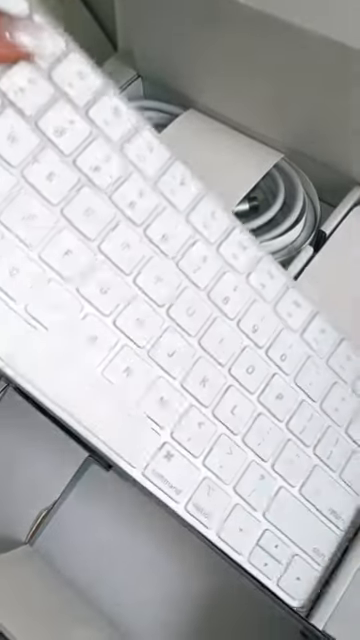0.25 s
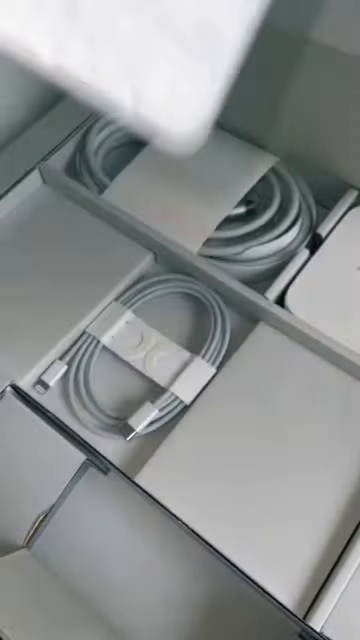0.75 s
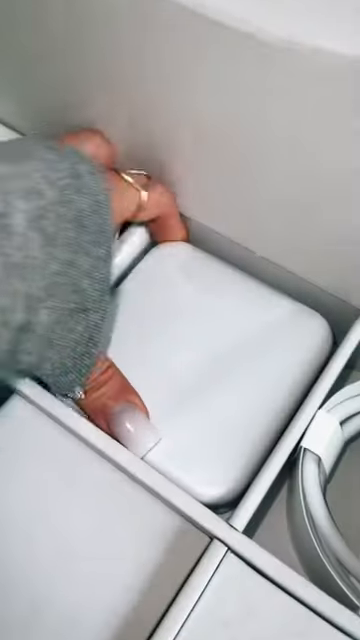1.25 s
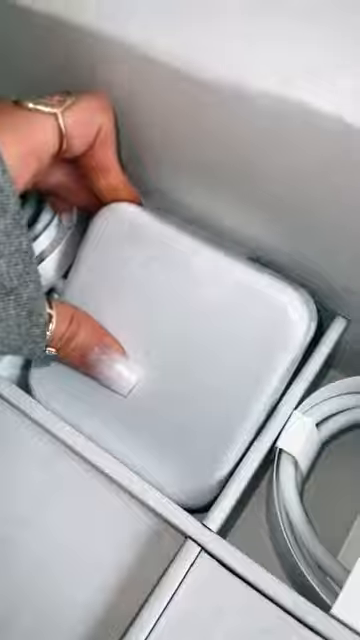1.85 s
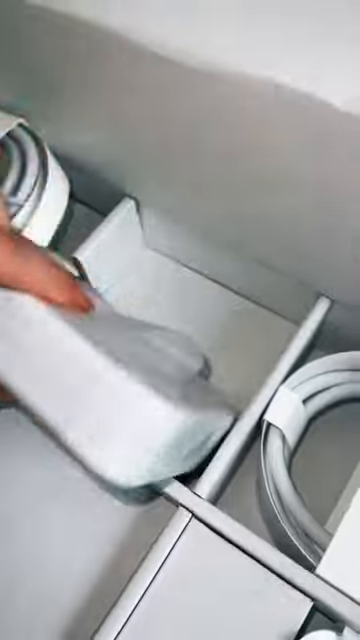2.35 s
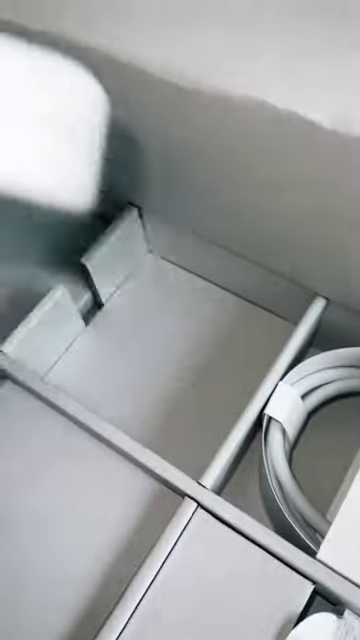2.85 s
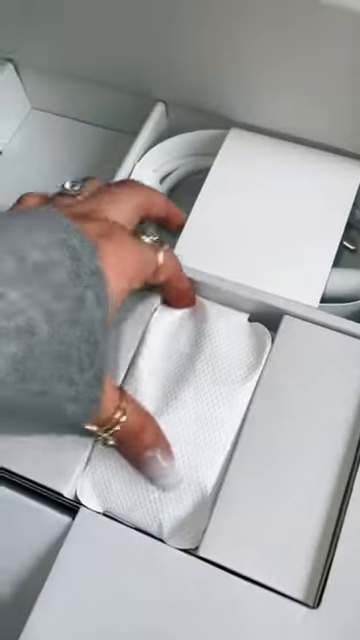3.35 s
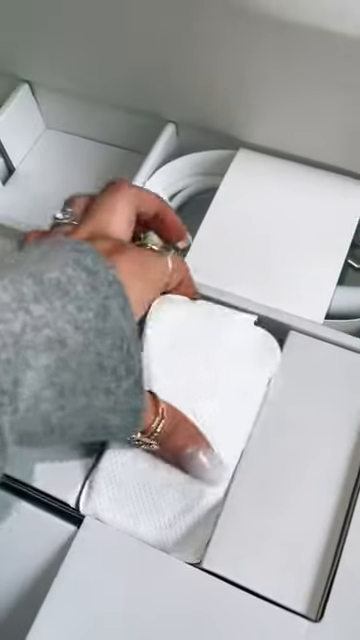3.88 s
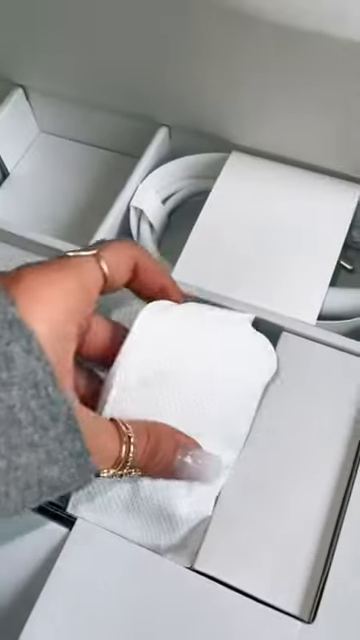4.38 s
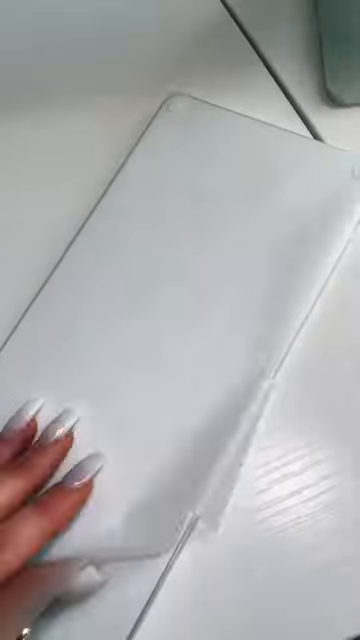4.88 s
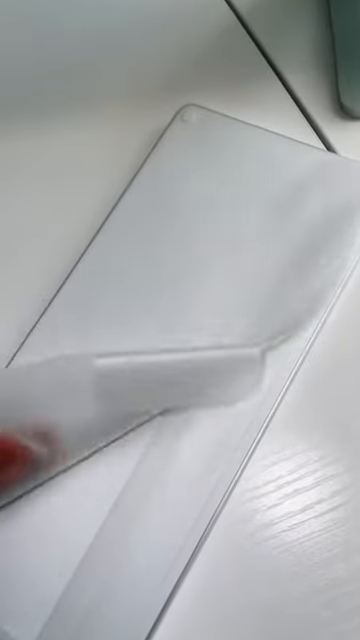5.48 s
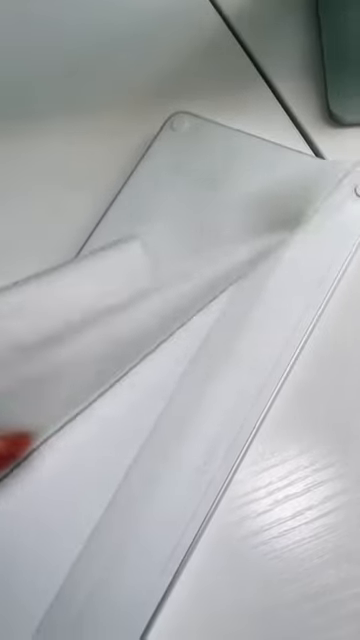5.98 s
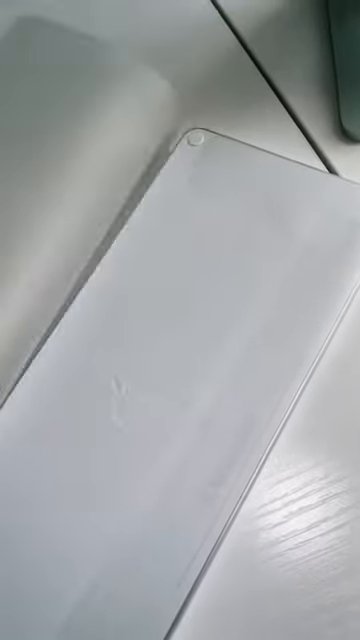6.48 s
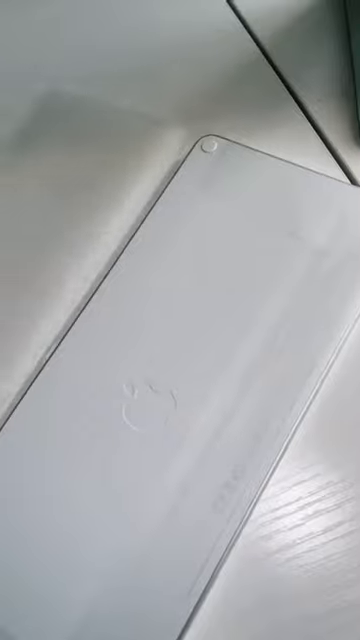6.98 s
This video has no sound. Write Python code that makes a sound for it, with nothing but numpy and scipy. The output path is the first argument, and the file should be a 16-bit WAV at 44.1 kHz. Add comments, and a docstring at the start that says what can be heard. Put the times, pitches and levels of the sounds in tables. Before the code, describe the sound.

Four close passages of unpacking, parted by brief silences: a light slide with thin hiss; scraping, fingernail taps, squeaky catches and soft thuds on a card box; faint papery creasing with a few ticks and one sharp knock; then a stiff wrapping sheet buckling in dense, loud snaps. Low rumble and soft hush lie beneath, with a small room's echo.

```python
"""A keyboard slides off its tray in a bare room, the first of four close-up passages of unpacking a box.
Then fingernails pry a wrapped power adapter and a paper-wrapped mouse out of card compartments, and a stiff
wrapping sheet is peeled back, snapping as it buckles. Rubbing is filtered stick-slip noise; taps, catches,
snaps and knocks are damped modes falling in pitch; the room adds decaying scatter, a low rumble and a hush."""
import sys
import numpy as np
from scipy import signal
from scipy.fft import rfft, irfft, next_fast_len
from scipy.io import wavfile
from scipy.ndimage import uniform_filter1d

SR = 44100
rng = np.random.default_rng(int(sys.argv[2]) if len(sys.argv) > 2 else 0)


def master(y):
    """Save y as 16-bit WAV."""
    cut = np.clip(np.atleast_2d(y).T, -1, 1)
    pcm = np.round(cut * 32767)  # scale
    wavfile.write(sys.argv[1], SR, pcm.astype(np.int16))


N = 318843
TIME = np.arange(N) / SR  # s
FREQS = np.maximum(np.fft.rfftfreq(N, 1 / SR), 1)  # Hz
# the four passages, with silence between them: start t/s, end t/s
PASSAGES = [(-.02, .7), (.893, 2.935), (3.125, 4.768), (4.935, 7.068)]


def keyboard_rubbing():
    """Sliding friction: slips on the tray excite the keyboard's modes."""
    # strokes of the hand: start t/s, length t/s, scraping level/dB, hiss over scraping level/dB
    strokes = [(0, 0.039, -45.5, -3.5), (.152, 0.02, -52.5, 5.5), (.185, 0.039, -38, -1),
               (.236, 0.021, -34, -1), (.285, 0.11, -52.5, -11)]
    # spectrum of the rubbing: f/Hz, relative density level/dB per Hz
    colour = [(130, 9), (215, 12), (430, 1.5), (560, -13.5), (1500, -12.5), (2050, -13.5), (3600, -9),
              (6000, -13), (8500, -13), (10000, -21)]
    # resonances: f/Hz, width f/Hz, level over the plain rubbing/dB
    modes = [(1730, 140, 9.5), (2410, 82, -1), (3620, 200, 4), (4400, 170, 2.5), (6440, 70, 4.5)]
    slips = friction(per_s=1600, spread_db=1, clump_db=2, smooth=0.3)
    return rubbing(strokes, colour, modes, slips,
                   attack_s=0.073, release_s=0.04, flex_db=-2, wander_db=1.5)


def adapter_rubbing():
    """Stick-slip on card, with creases that yield and ring in the wrapping."""
    # strokes of the hand: start t/s, length t/s, scraping level/dB, hiss over scraping level/dB
    strokes = [(1.085, 0.099, -56, -9), (1.34, 0.074, -50, -15.5), (1.44, 0.096, -46, -10),
               (1.592, 0.027, -39, -17.5), (1.66, 0.035, -54, -0.5), (1.735, 0.046, -50, -7),
               (1.872, 0.035, -38, -12.5), (1.935, 0.048, -35, -1.5), (2.04, 0.097, -46.5, -2.5),
               (2.15, 0.066, -46, -4), (2.298, 0.085, -36, -7.5), (2.39, 0.062, -32, -11),
               (2.465, 0.014, -33, -2.5), (2.535, 0.07, -55, 10.5), (2.69, 0.073, -44, -9),
               (2.8, 0.06, -44, -5.5), (2.88, 0.077, -52, -5.5)]
    # spectrum of the rubbing: f/Hz, relative density level/dB per Hz
    colour = [(120, -3), (170, 3), (300, -5), (500, -10.5), (690, -4), (1150, -7.5), (2100, -7.5),
              (2900, -16), (6000, -19.5), (9000, -21), (10000, -32)]
    slips = friction(per_s=1800, spread_db=2, clump_db=4, smooth=0.55)
    slips += crinkles(per_s=110, level_db=0, spread_db=2.5, centre_hz=2800, spread_octaves=0.7, cycles=7)
    return rubbing(strokes, colour, [], slips,
                   attack_s=0.069, release_s=0.084, flex_db=1.0, wander_db=1.0)


def mouse_rubbing():
    """Stick-slip on card and lower-pitched paper creases excite the wrapped mouse's modes."""
    # strokes of the hand: start t/s, length t/s, scraping level/dB, hiss over scraping level/dB
    strokes = [(3.125, 0.011, -52.5, -15.5), (3.275, 0.014, -55.5, -8), (3.4, 0.0076, -52, -6),
               (3.475, 0.047, -55, -9.5), (3.605, 0.042, -48.5, -4), (3.645, 0.023, -47, -9.5),
               (3.76, 0.16, -50, -10), (3.984, 0.028, -45.5, -3.5), (4.235, 0.04, -49, -5),
               (4.356, 0.013, -36.5, -5), (4.42, 0.064, -58.5, -16.5), (4.56, 0.29, -72.5, -36)]
    # spectrum of the rubbing: f/Hz, relative density level/dB per Hz
    colour = [(110, 2.5), (210, -5), (330, -7), (800, -6.5), (1100, -3), (1600, -9.5), (2100, -8.5),
              (2800, -20), (3900, -16), (4800, -20.5), (7500, -19.5), (10000, -31)]
    # resonances: f/Hz, width f/Hz, level over the plain rubbing/dB
    modes = [(181.7, 60, -5), (387, 290, 1), (1177, 92, 1), (2250, 860, -2.5)]
    slips = friction(per_s=1800, spread_db=2, clump_db=4, smooth=0.55)
    slips += crinkles(per_s=110, level_db=-0.5, spread_db=3, centre_hz=1800, spread_octaves=0.6, cycles=9)
    return rubbing(strokes, colour, modes, slips,
                   attack_s=0.093, release_s=0.095, flex_db=-1.0, wander_db=5.5)


def sheet_rubbing():
    """Dense stick-slip and yielding creases excite a stiff sheet."""
    # strokes of the hand: start t/s, length t/s, scraping level/dB, hiss over scraping level/dB
    strokes = [(4.95, 0.16, -62.5, -0.5), (5.135, 0.025, -52.5, 1), (5.337, 0.025, -46.5, -3.5),
               (5.53, 0.038, -45.5, -3), (5.7, 0.042, -48, 0), (5.82, 0.023, -45, -2),
               (5.93, 0.048, -39, 2.5), (6.02, 0.02, -45, 4), (6.09, 0.062, -50.5, -8.5),
               (6.262, 0.05, -49, 6), (6.345, 0.055, -35.5, -6), (6.41, 0.075, -39, -11),
               (6.472, 0.07, -38, -0.5), (6.594, 0.0099, -33.5, -2), (6.638, 0.028, -34, -2.5),
               (6.69, 0.1, -51.5, 5.5), (6.845, 0.021, -34, -6.5), (6.9, 0.018, -32.5, -9.5),
               (6.96, 0.032, -42, -7), (7.01, 0.023, -38, -3.5)]
    # spectrum of the rubbing: f/Hz, relative density level/dB per Hz
    colour = [(190, 3.5), (430, -0.5), (650, 0), (950, -8), (1850, -3.5), (2600, -5), (4000, 2), (6400, -1),
              (7600, 2.5), (10000, -7)]
    # resonances: f/Hz, width f/Hz, level over the plain rubbing/dB
    modes = [(810, 98, -0.56)]
    slips = friction(per_s=2000, spread_db=2, clump_db=4.5, smooth=0.55)
    slips += crinkles(per_s=70, level_db=3.5, spread_db=3, centre_hz=3000, spread_octaves=0.8, cycles=7)
    return rubbing(strokes, colour, modes, slips,
                   attack_s=0.049, release_s=0.038, flex_db=-3.0, wander_db=3.0)


def friction(per_s, spread_db, clump_db, smooth):
    """Stick-slip: fibres catch and let go in clumps of tiny slips, over a smooth sliding noise."""
    sizes = from_db(spread_db * np.minimum(rng.exponential(1, N), 4))
    sizes = sizes * rng.choice([-1, 1], N)
    happens = rng.random(N) < per_s / SR
    slips = sizes * happens * from_db(clump_db * drift(TIME, rate=140))
    # a steady hand releases about the same energy in every stretch of the stroke
    energy = uniform_filter1d(slips ** 2, size=SR // 25)
    steady = slips / np.sqrt(np.maximum(energy, 1e-6))
    return steady + smooth * rng.standard_normal(N)


def crinkles(per_s, level_db, spread_db, centre_hz, spread_octaves, cycles):
    """Sudden yielding: at random moments a crease gives way and rings briefly at a pitch of its own."""
    out, t = np.zeros(N), TIME[:SR // 50]
    chance = np.clip(rng.standard_normal((N, 2)), -2, 2)
    for i in np.flatnonzero(rng.random(N) < per_s / SR):
        size, pitch = chance[i]
        hz = centre_hz * 2 ** (spread_octaves * pitch)
        ring = damped(t, hz, t60=cycles / hz, rise=0.5 / hz)
        add(out, i / SR, from_db(level_db + spread_db * size) * ring)
    return out


def rubbing(strokes, colour, modes, slips, attack_s, release_s, flex_db, wander_db):
    """Forced vibration: slips make the object flex in the bass, scrape in the middle and hiss on top."""
    # flexing, scraping and hissing: low f/Hz, high f/Hz
    bands = [(130, 500), (500, 2800), (2800, 10000)]
    wander_per_s = 45  # how often the colour of a rub shifts
    touching = (TIME > strokes[0][0] - 0.1) & (TIME < strokes[-1][0] + 0.25)
    t, out = TIME[touching], np.zeros(N)
    size = next_fast_len(len(t))
    hz = np.maximum(np.fft.rfftfreq(size, 1 / SR), 1)
    peaks = sum(from_db(2 * db) / (1 + (2 * (hz - centre) / width) ** 2) for centre, width, db in modes)
    response = from_db(at_hz(colour, hz)) * np.sqrt(1 + peaks) * band(hz, 132, 12000)
    shaken = rfft(slips[touching], size) * response
    levels = stroke_levels(strokes, t, attack_s, release_s, flex_db)
    drive_db = []
    for db, edges in zip(levels, bands):
        band_rms = irfft(shaken * band(hz, *edges), size).std()
        drive_db.append(db - 20 * np.log10(band_rms))
    centres = np.geomspace(150, 9000, 16)  # Hz, of overlapping triangular bands
    for centre, this_band in zip(centres, np.eye(len(centres))):
        weight = np.interp(np.log(hz), np.log(centres), this_band)
        part = irfft(shaken * weight, size)[:len(t)]
        # the drive blends from flexing (0) over scraping (1) to hissing (2), so a fading rub darkens gradually
        register = at_hz([(300, 0), (750, 0.9), (2200, 1.1), (3800, 2)], centre)
        level_db = sum(max(1 - abs(register - k), 0) * db for k, db in enumerate(drive_db))
        # the point of contact wanders, and the colour with it
        out[touching] += part * from_db(level_db + wander_db * drift(t, wander_per_s))
    return out


def stroke_levels(strokes, t, attack_s, release_s, flex_db):
    """Energy summation: strokes rise 20 dB per attack, hold, and fall 20 dB per release; flexing is compressed."""
    light_touch_db, flex_follows = -45.5, 0.42  # flexing takes only this share of the rise above a light touch
    scrape = hiss = 1e-12
    for s, length, db, hiss_db in strokes:
        outside = np.maximum(s - t, 0) / attack_s + np.maximum(t - s - length, 0) / release_s
        power = from_db(db - 20 * outside) ** 2
        scrape = scrape + power
        hiss = hiss + power * from_db(hiss_db) ** 2
    scrape_db = 10 * np.log10(scrape)
    held_back_db = (1 - flex_follows) * np.maximum(scrape_db - light_touch_db, 0)
    return scrape_db + flex_db - held_back_db, scrape_db, 10 * np.log10(hiss)


def snaps():
    """Buckling instability: the wrapping snaps over, with a crack and a ring that falls in pitch."""
    # t/s, ring level/dB, ring f/Hz, ring t60/s, crack level/dB, crack f/Hz (before the offsets and glide below)
    rows = [(2.1147, -51.5, 560, 0.0082, -29.5, 5400), (2.5425, -48, 2300, 0.0067, -31, 5500),
            (2.5454, -48.5, 2140, 0.005, -25.5, 7240), (3.1572, -39, 2460, 0.0048, -39.5, 3950),
            (3.6315, -41, 775, .005, -40.5, 4950), (3.68, -34.5, 1180, 0.0046, -42, 4660),
            (3.7025, -34, 1750, 0.011, -43, 7100), (3.912, -28, 1144, 0.0072, -39, 4180),
            (5.1184, -31.5, 1285, 0.005, -27, 7330), (5.1265, -30.5, 1310, 0.0066, -37, 5460),
            (5.1733, -31, 1950, 0.0027, -19.5, 8180), (5.3427, -19, 880, 0.0012, -27, 7840),
            (5.3583, -34, 1330, 0.02, -26.5, 8200), (5.5555, -24, 940, 0.0044, -32, 6950),
            (5.607, -31, 1330, 0.0065, -48, 6000), (5.7336, -16, 1550, 0.0023, -28.5, 6230),
            (5.7483, -25, 1390, .005, -20.5, 7000), (5.8903, -22, 1290, 0.0048, -33, 3040),
            (5.8973, -16.5, 2200, 0.0035, -54, 2980), (5.93, -10, 2000, 0.0042, -11.5, 6000),
            (5.932, -7.5, 1800, 0.0028, -13, 6200), (5.9453, -3.5, 1340, 0.0039, -17.5, 4940),
            (5.9566, -0.5, 1150, 0.0088, -44, 6920), (6.035, -39, 1300, 0.0068, -26.5, 8400),
            (6.1196, -21.5, 1190, 0.0063, -38, 4130), (6.1962, -14, 1620, 0.0027, -20.5, 4400),
            (6.2451, -6, 1770, 0.0034, -14.5, 3870), (6.2659, -18, 1790, 0.0079, -24.5, 7800),
            (6.3574, -4, 1690, 0.0048, -24, 5230), (6.4035, -7, 1700, 0.0038, -26, 7360),
            (6.4324, -15, 1770, 0.0067, -23.5, 4570), (6.4695, -15.5, 870, 0.0043, -32, 4970),
            (6.4825, -16.5, 1570, 0.0017, -23, 6700), (6.5076, -9, 1880, 0.0019, -17, 4400),
            (6.529, -21, 1680, 0.0068, -28, 8350), (6.6129, -22, 1820, 0.0092, -24, 7560),
            (6.632, -16, 1840, 0.0063, -18.5, 7650), (6.6403, -16, 2100, 0.0081, -17.5, 4280),
            (6.6493, -30.5, 2320, .004, -16, 8200), (6.6547, -15.5, 1910, 0.0055, -21, 7400),
            (6.658, -7.5, 1980, 0.0022, -14, 3560), (6.825, -13, 1760, 0.00315, -24, 5200),
            (6.843, -21, 1770, 0.0079, -30.5, 4530), (6.8893, -11.5, 3300, 0.003, -14, 3900),
            (6.906, -23.5, 3080, 0.0048, -23, 3470), (7.013, -23.5, 1980, 0.0091, -22.5, 4060)]
    # first pitch ratio, last pitch ratio, time constant/nominal cycles
    glide = (1.254, 0.3, 3.09)
    return click_sounds(rows, ring_db=-0.46, glide=glide, crack_db=7.0, crack_t60=0.0017,
                        splinter_db=4.5, splinter_t60=0.015, splinter_reach=0.69)


def taps():
    """Impact excitation: fingernails strike card, which rings briefly."""
    # t/s, ring level/dB, ring f/Hz, ring t60/s, crack level/dB (before the offsets and glide below)
    rows = [(1.076, -27, 740, 0.0031, -39), (1.5792, -18, 650, 0.0052, -41.5),
            (1.589, -22, 645, 0.0061, -44.5), (1.604, -23, 630, 0.0049, -45),
            (1.9567, -18.5, 690, 0.011, -27), (2.4648, -13, 2230, 0.0029, -20),
            (3.412, -24.5, 1210, 0.0073, -46.5), (3.952, -21, 1420, 0.0032, -44.5),
            (3.9668, -20.5, 1780, 0.0035, -33), (3.9864, -26, 1240, 0.0065, -39),
            (4.232, -27, 1200, 0.0074, -45.5), (4.2536, -28, 1790, 0.0054, -52.5),
            (4.3057, -19, 1400, 0.0066, -37.5), (4.324, -10.5, 1030, 0.011, -44),
            (4.3272, -3, 1130, 0.0041, -23.5)]
    # first pitch ratio, last pitch ratio, time constant/nominal cycles
    glide = (1.07, 0.85, 5.1)
    crack_hz = 3150
    return click_sounds([(*tap, crack_hz) for tap in rows], ring_db=0.5, glide=glide, crack_db=9.5,
                        crack_t60=0.0011, splinter_db=-2.5, splinter_t60=0.038, splinter_reach=1.0)


def catches():
    """Stick and release: the adapter catches on the compartment wall and lets go with a short chirp."""
    # t/s, ring level/dB, ring f/Hz (before the offset and glide below)
    rows = [(1.471, -28, 2110), (1.645, -13.5, 2105), (1.743, -34, 2370), (1.9118, -14.5, 2110),
            (1.9158, -18.5, 2070), (1.9255, -16.5, 2230), (1.9353, -15.5, 2080), (1.9618, -26, 2300),
            (1.9711, -11.5, 2410), (1.9857, -22, 1460), (2.3004, -25.5, 2170), (2.3787, -19, 2080),
            (2.4056, -20, 2200), (2.4165, -18, 2170), (2.4242, -17.5, 2030), (2.4918, -18, 1830)]
    # first pitch ratio, last pitch ratio, time constant/nominal cycles
    glide = (1.067, 0.76, 7.0)
    t60_s, crack_over_ring_db = 0.014, -14  # the crack level is also offset by crack_db
    clicks = [(s, db, hz, t60_s, db + crack_over_ring_db, 2 * hz) for s, db, hz in rows]
    return click_sounds(clicks, ring_db=-1.0, glide=glide, crack_db=-0.5, crack_t60=0.0032,
                        splinter_db=-0.5, splinter_t60=0.016, splinter_reach=0.6)


def click_sounds(rows, ring_db, glide, crack_db, crack_t60, splinter_db, splinter_t60, splinter_reach):
    """Transient excitation: a sharp crack, a short spray of snapping fibres, and a falling ring of the panel."""
    out, t = np.zeros(N), np.arange(SR // 20) / SR
    for s, level, hz, t60, crack_level, crack_hz in rows:
        panel = bending(t, hz, t60, 0.00025, glide)
        cutoff_hz = min(splinter_reach * crack_hz, SR / 4)
        treble = signal.butter(2, cutoff_hz, "high", fs=SR, output="sos")
        spray = signal.sosfilt(treble, rng.standard_normal(len(t)))
        spray = spray * from_db(-60 * t / splinter_t60) * (1 - np.exp(-t / 0.0005))
        crack = from_db(crack_db) * damped(t, crack_hz, crack_t60, 0.00025) + from_db(splinter_db) * spray
        add(out, s, from_db(level + ring_db) * panel + from_db(crack_level) * crack)
    return out


def knocks():
    """Impact excitation: a soft blow sets a box wall swinging."""
    # t/s, level/dB, f/Hz before the glide, t60/s
    blows = [(.002, -32, 160, 0.06), (1.073, -31.5, 200, 0.034), (1.37, -25.5, 233, 0.032),
             (1.526, -30, 200, 0.076), (1.579, -21.5, 417, 0.041), (1.604, -21, 175, 0.064),
             (1.801, -21.5, 85, 0.061), (1.868, -27, 241, 0.12), (1.926, -23.5, 160, 0.043),
             (2.147, -25.5, 71.5, 0.088), (2.167, -23.5, 164, 0.11), (2.465, -17.5, 217, 0.028),
             (2.733, -32, 93, 0.083), (2.832, -27.5, 92, 0.063), (3.414, -21.5, 446, 0.016),
             (3.418, -19.5, 165, 0.03), (3.428, -27, 95.5, 0.06), (3.911, -33.5, 175, 0.093),
             (4.31, -25, 180, 0.032), (4.332, -15.5, 169.3, 0.024), (5.347, -32, 200, 0.067),
             (5.931, -17.5, 285, 0.041), (6.6, -24.5, 79.5, 0.022)]
    # first pitch ratio, last pitch ratio, time constant/nominal cycles
    glide = (1.9, 0.7, 0.85)
    out, t = np.zeros(N), np.arange(SR // 4) / SR
    for s, db, hz, t60 in blows:
        add(out, s, from_db(db) * bending(t, hz, t60, 0.5 / hz, glide))
    return out


def bending(t, hz, t60, rise, glide):
    """Dispersion: short bending waves travel fastest, so a struck panel drops in pitch as it dies away."""
    first, last, cycles = glide
    pitch = hz * (last + (first - last) * np.exp(-t * hz / cycles))
    return swell_and_decay(t, t60, rise) * np.sin(2 * np.pi * np.cumsum(pitch) / SR)


def damped(t, hz, t60, rise):
    """Free damped vibration: a struck mode at constant pitch."""
    return swell_and_decay(t, t60, rise) * np.sin(2 * np.pi * hz * t)


def swell_and_decay(t, t60, rise):
    """Exponential damping after a swell over the contact time; peak 1."""
    envelope = (1 - np.exp(-(t / rise) ** 2)) * from_db(-60 * t / t60)
    return envelope / envelope.max()


def squeaks():
    """Very fast stick-slip: wrapping and metal skid with a thin, high band of noise that swells and fades."""
    # start t/s, length t/s, level/dB, f/Hz, width f/Hz
    skids = [(0, .07, -43.5, 8240, 1490), (0.212, 0.048, -40.5, 6330, 120),
             (1.855, 0.088, -42.5, 8860, 900), (5.732, 0.034, -36, 7900, 1100),
             (6.012, 0.03, -38, 8600, 1300), (6.254, 0.031, -40.5, 8900, 1300)]
    out = np.zeros(N)
    for s, length, db, hz, width in skids:
        sos = signal.butter(2, [hz - width / 2, hz + width / 2], "band", fs=SR, output="sos")
        swell = np.sqrt(np.hanning(int(length * SR)))
        noise = rms_one(signal.sosfilt(sos, rng.standard_normal(SR)))
        add(out, s, from_db(db) * swell * noise[-len(swell):])
    return out


def room_response(near_db, near_t60, far_db):
    """Reverberation: quick scatter from box and desk, then a diffuse tail that dies band by band."""
    # reverberation time: f/Hz, t60/s
    tail_t60 = [(100, 0.26), (500, 0.6), (1500, 0.61), (4000, 0.83), (10000, 0.088)]
    # spectrum of the reflections: f/Hz, gain level/dB
    colour = [(60, 0.5), (130, -3), (200, 3.5), (300, 1.5), (410, 5), (540, -0.5), (680, 1), (1200, -0.5),
              (3000, 4), (10000, -5.5)]
    t, out = TIME[:SR], np.zeros(SR)
    edges = np.geomspace(60, 12000, 9)  # Hz
    for low, high in zip(edges, edges[1:]):
        hz = np.sqrt(low * high)
        near = from_db(-60 * t / near_t60) * (t > 0.001)
        far = from_db(-60 * t / at_hz(tail_t60, hz)) * (t > 0.006)
        envelope = from_db(near_db) * near / np.linalg.norm(near)
        envelope = envelope + from_db(far_db) * far / np.linalg.norm(far)
        sos = signal.butter(2, [low, high], "band", fs=SR, output="sos")
        out += from_db(at_hz(colour, hz)) * signal.sosfilt(sos, envelope * rng.standard_normal(SR))
    return out


def rumble():
    """Modal colouring: dull noise round the room's lowest resonance, under a hush that rises and falls with it."""
    # rumble level, one curve per passage: t/s, level/dB before rumble_db is added
    curves = [
        [(0.05, -48), (0.188, -58), (0.5, -56)],
        [(1.06, -68), (1.59, -45.5), (2.72, -55)],
        [(3.3, -66.5), (3.556, -55.5), (4.55, -54)],
        [(5.11, -66.5), (5.948, -48.5), (6.85, -49)],
    ]
    # spectrum of the rumble: f/Hz, relative density level/dB per Hz
    rumble_colour = [(20, -31), (40, -17), (59, -0.5), (80, -8), (120, -13.5), (170, -20.5), (300, -50.5)]
    # spectrum of the hush: f/Hz, relative density level/dB per Hz
    hush_colour = [(84, -35.5), (145, -7), (302, -10.5), (455, -13), (489, -16), (1050, -21), (1450, -28),
                   (3190, -34.5), (10000, -61.5), (13000, -96.5), (22000, -120)]
    rumble_db = 3.5
    hush_db, hush_follows = -52, 0.81  # level at mean rumble; share of the rumble's swing
    low = coloured_noise(rumble_colour)
    hush = coloured_noise(hush_colour)
    level_db = np.zeros(N)
    for (start, _), curve in zip(PASSAGES, curves):
        later = TIME >= start
        level_db[later] = np.interp(TIME[later], *np.transpose(curve))
    swing_db = level_db - level_db.mean()
    return from_db(level_db + rumble_db) * low + from_db(hush_db + hush_follows * swing_db) * hush


def coloured_noise(colour):
    """Spectral shaping of white noise, scaled to unit power."""
    return rms_one(irfft(rfft(rng.standard_normal(N)) * from_db(at_hz(colour, FREQS)), N))


def from_db(db):
    """Level to amplitude: 20 dB is a factor of ten."""
    return 10 ** (np.asarray(db) / 20)


def rms_one(x):
    """Power normalisation: scale to unit mean square."""
    return x / np.sqrt(np.mean(x ** 2) + 1e-20)


def at_hz(points, hz):
    """Logarithmic frequency scale: interpolate a table along it."""
    points = np.array(points)
    return np.interp(np.log(hz), np.log(points[:, 0]), points[:, 1])


def band(hz, low, high):
    """Band-pass filtering: gain with steep edges."""
    return 1 / np.sqrt((1 + (low / hz) ** 12) * (1 + (hz / high) ** 12))


def drift(t, rate):
    """Slow random modulation: chance values, rate per second, joined by lines."""
    return np.interp(t * rate, np.arange(N // 20), rng.standard_normal(N // 20))


def add(track, s, sound):
    """Superposition: mix a sound in at a time in seconds."""
    start = max(round(s * SR), 0)
    track[start:start + len(sound)] += sound[:N - start]


def scene():
    """Superposition of direct sound, its reverberation and the background."""
    rubs = keyboard_rubbing() + adapter_rubbing() + mouse_rubbing() + sheet_rubbing() + squeaks()
    hits = snaps() + taps() + catches() + knocks()
    room = room_response(near_db=-10.5, near_t60=0.016, far_db=-12.0)
    echo = signal.fftconvolve(hits + rubs, room)[:N]
    return (rubs + hits + echo + rumble())[None]


def record(dry):
    """Saturation and low-pass filtering: peaks are rounded, short fades part the passages, the top is cut."""
    cutoff_hz = 9750
    kept = sum(np.interp(TIME, [start - 0.002, start + 0.002, end - 0.005, end + 0.004], [0, 1, 1, 0])
               for start, end in PASSAGES)
    rounded = dry / (1 + (dry / 0.95) ** 6) ** (1 / 6)
    low_pass = signal.firwin(201, cutoff_hz, window=("kaiser", 7), fs=SR)
    return signal.fftconvolve(rounded * kept, low_pass[None], mode="same")


dry = scene()
out = record(dry)
master(out)
```